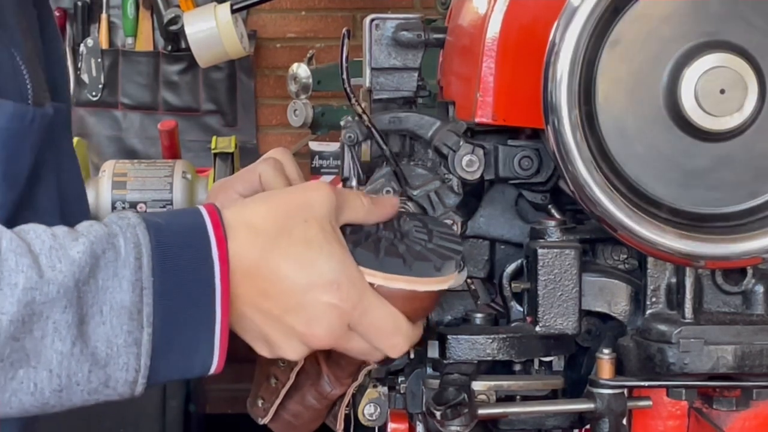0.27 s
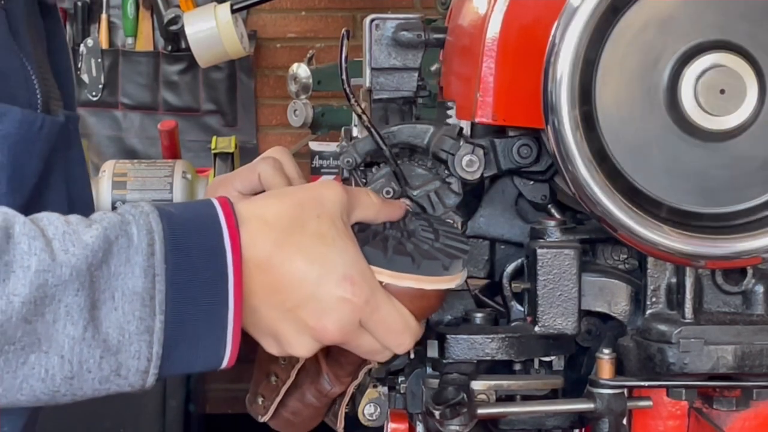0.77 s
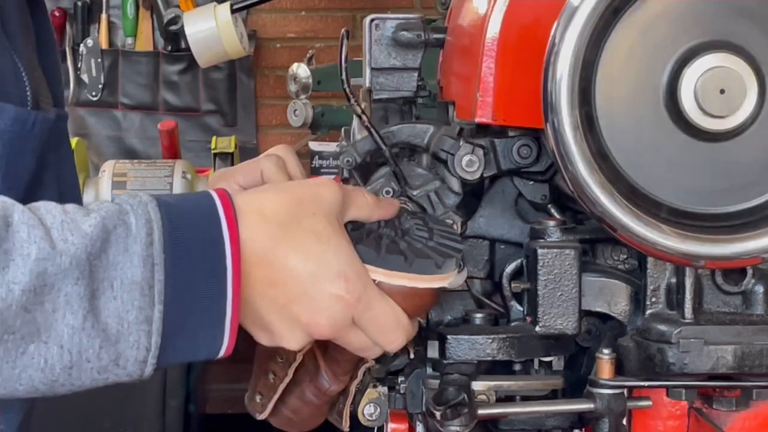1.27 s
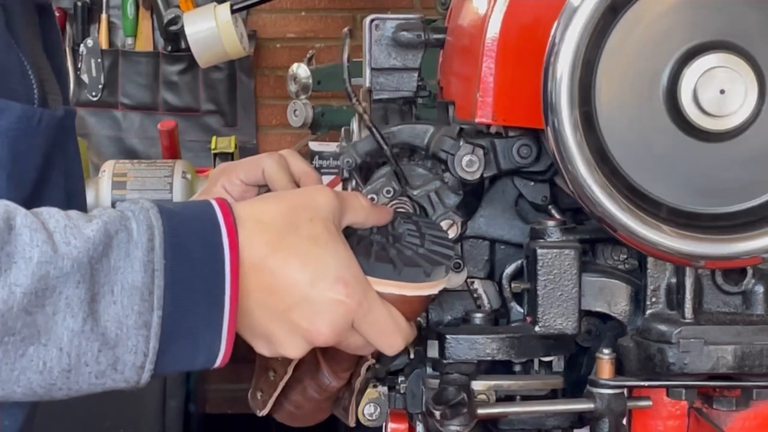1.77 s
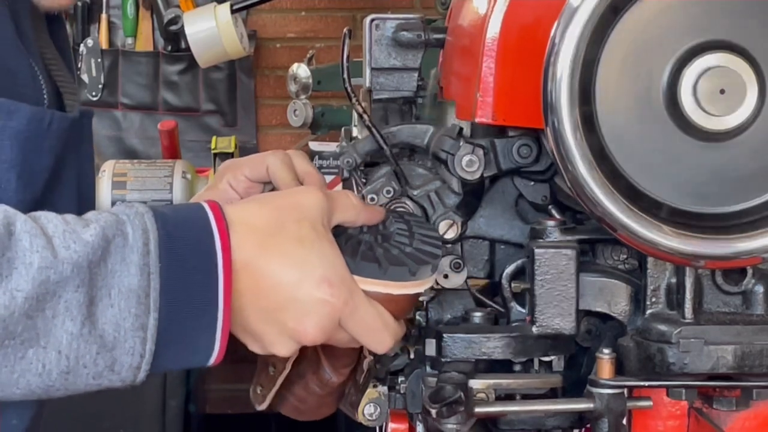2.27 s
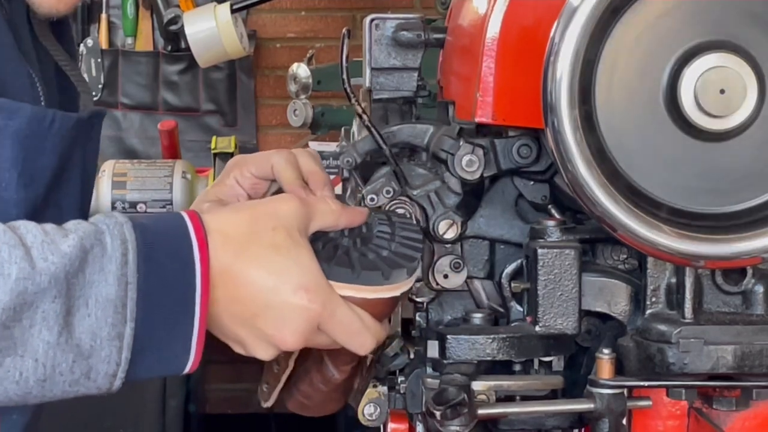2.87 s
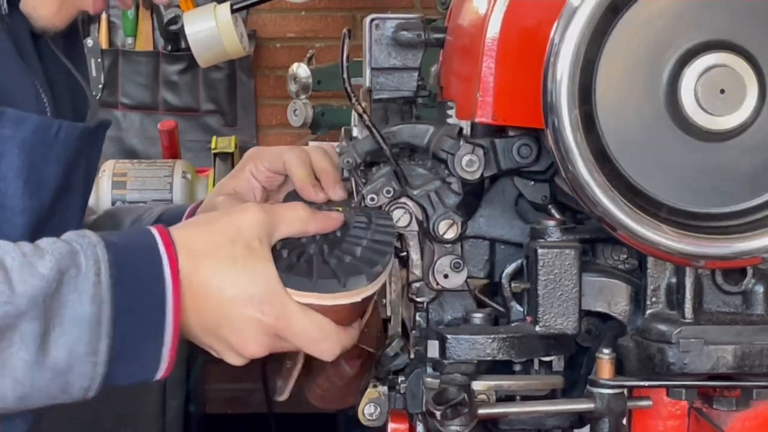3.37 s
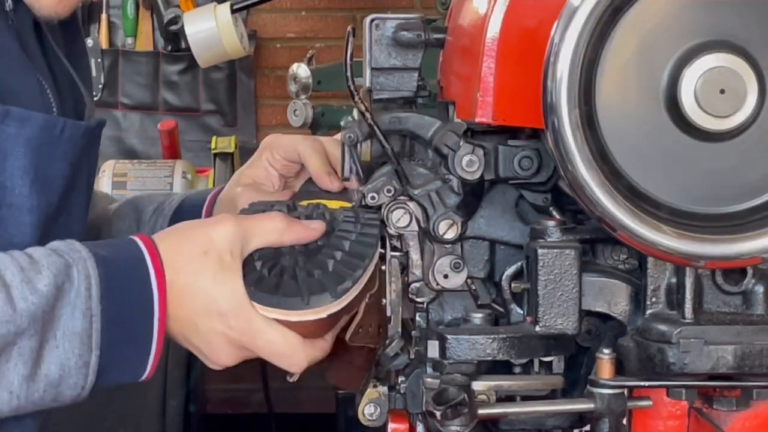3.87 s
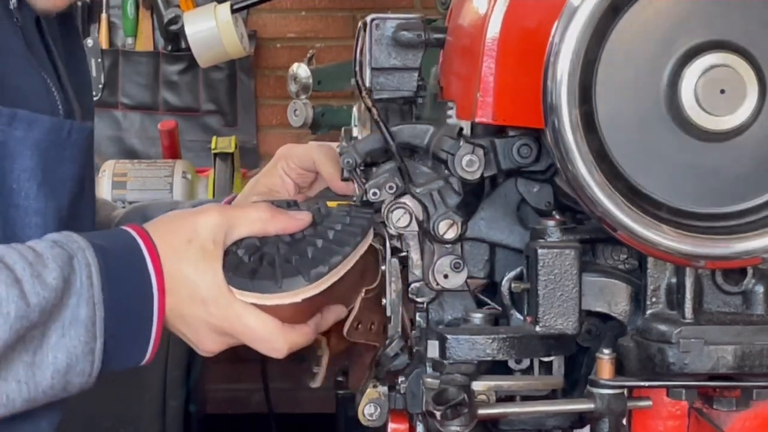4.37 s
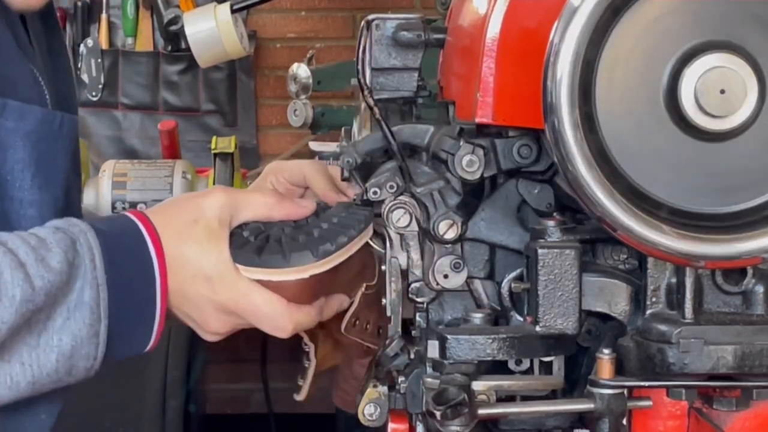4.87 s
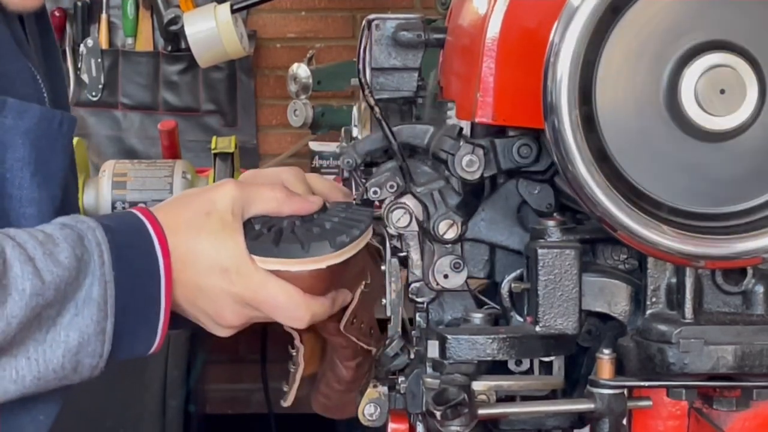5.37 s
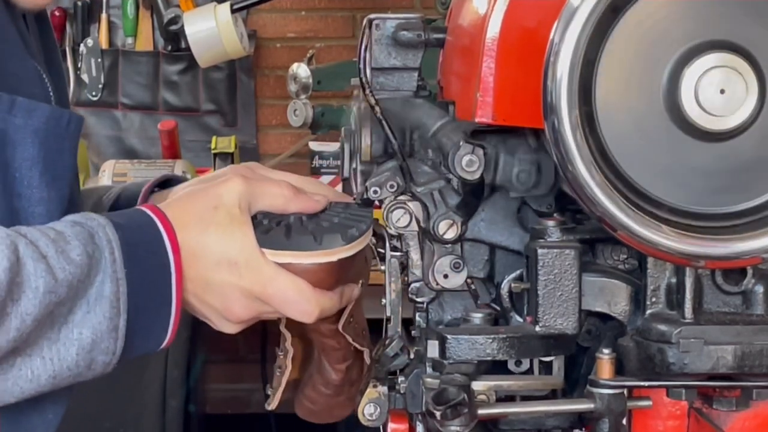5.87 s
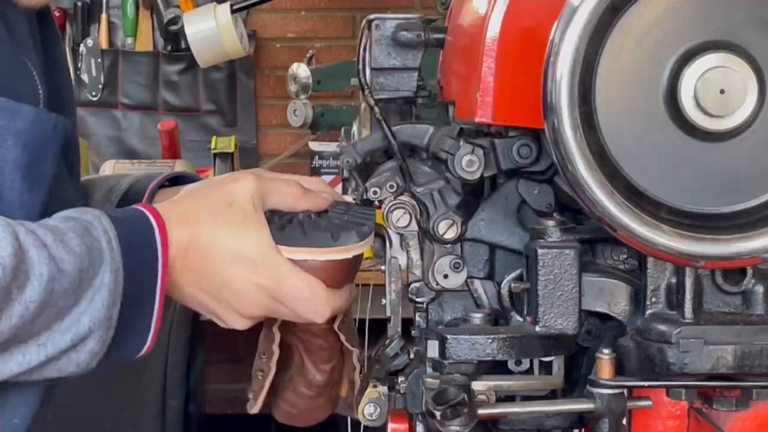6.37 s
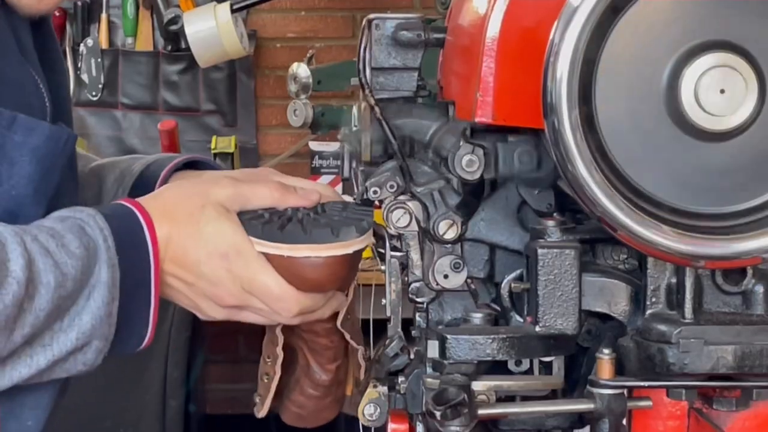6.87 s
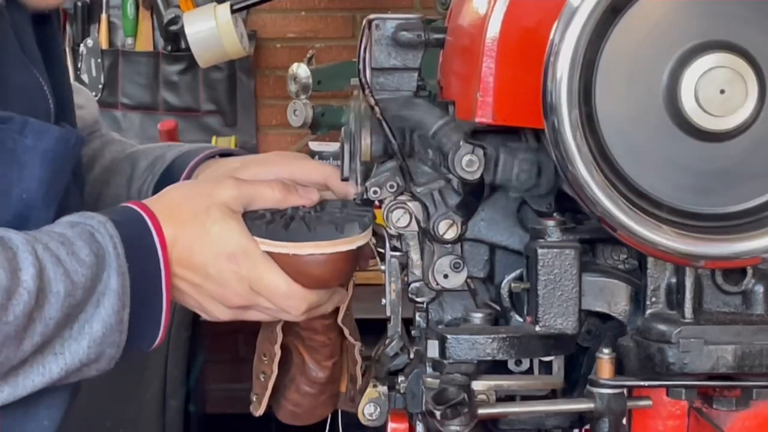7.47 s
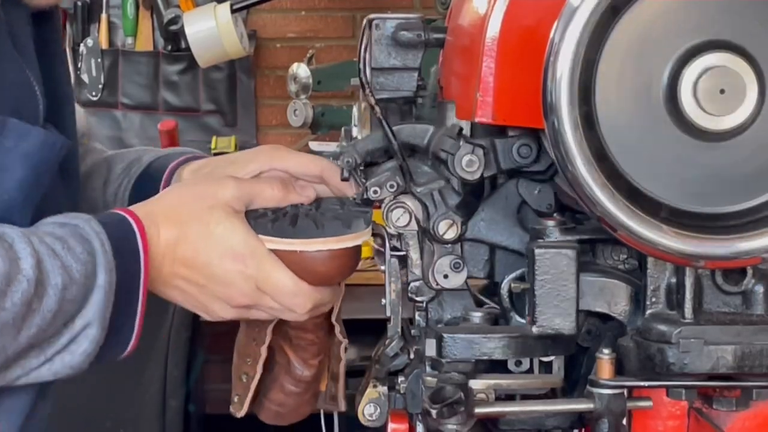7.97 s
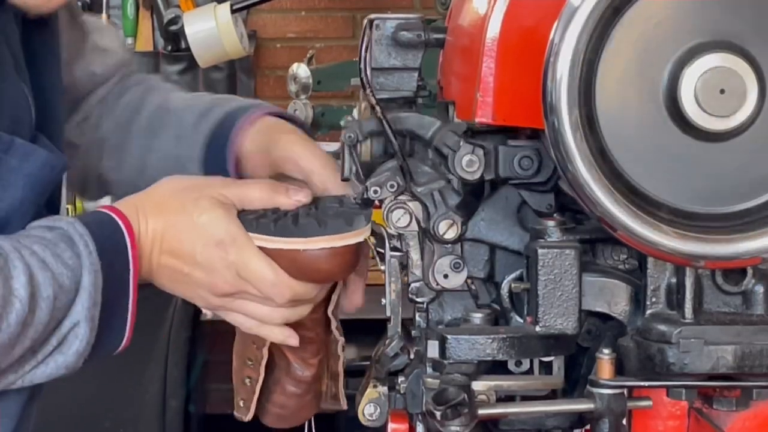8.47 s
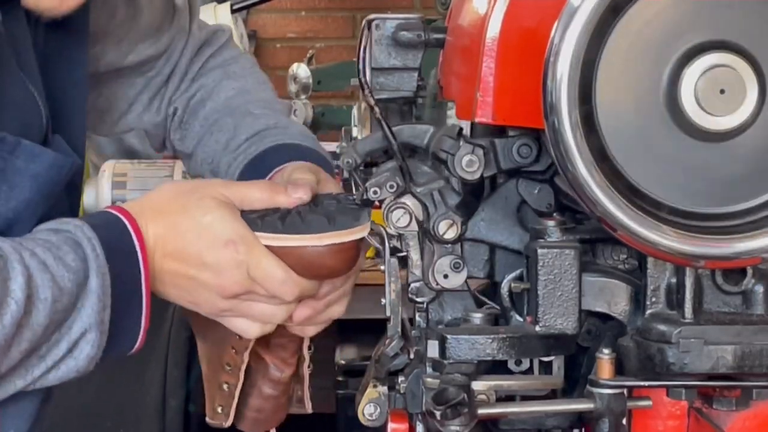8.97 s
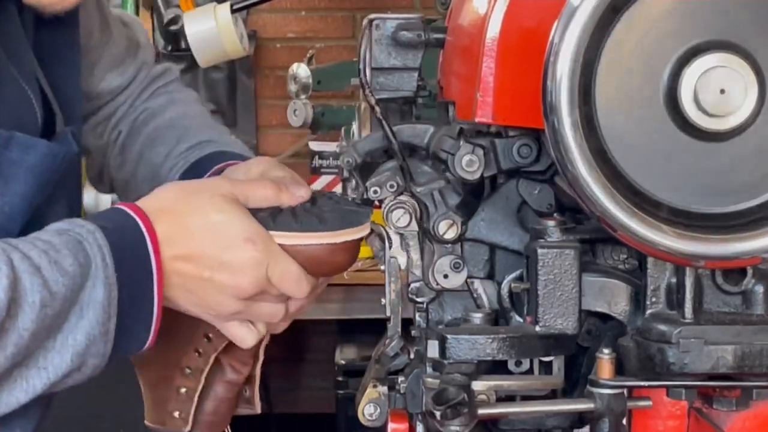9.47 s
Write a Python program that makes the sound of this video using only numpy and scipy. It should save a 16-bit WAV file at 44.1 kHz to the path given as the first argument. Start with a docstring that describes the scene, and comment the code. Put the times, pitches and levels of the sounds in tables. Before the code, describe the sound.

A cast-iron boot-stitching machine heard close up in a small workshop with short, dense echoes. From 0 to 0.9 s a low motor hum and soft belt rush idle beneath irregular, sharp lever knocks, clustered near 0.2, 0.35 and 0.9 s, with a brief low groan from the clutch. At about 0.95 s it grips, and the first, weaker stitch lands. From 1.2 s it pounds about four strokes a second, reaching five by 3 s as the hum sinks away. Each stroke is a bright steel punch, a locking clack some 40 ms later, rattling cams and links, short metallic rings, faint thread hiss, a droning drive and dull frame and bench thumps. An extra hard crack comes at 3.25 s. Around 5 to 5.9 s strokes soften and slow slightly, with a stray knock at 5.7 s. After 6 s they firm up, a faint gear whine joins, and the clatter continues unbroken to about 9.7 s.

```python
"""Boot-stitching machine in a small workshop

A cast-iron sole stitcher, heard close up, ticks over with a motor hum until a clutch bites.
It then makes about five stitches a second, and the hum sinks; in each turn the awl punches, cams and
levers clatter, the stitch is locked and the frame thumps. Random knocks and timed blows are played through
the ringing of the steel, frame and bench; sine waves make the hum, the drone and the clutch's groan."""
import sys
import numpy as np
from scipy import signal
from scipy.fft import rfft, irfft, next_fast_len
from scipy.io import wavfile
from scipy.ndimage import uniform_filter1d

SR = 44100
rng = np.random.default_rng(int(sys.argv[2]) if len(sys.argv) > 2 else 0)


def pcm_store(signal):
    """Save signal as 16-bit PCM."""
    levels = np.round(np.clip(np.atleast_2d(signal), -1, 1) * 32767)
    wavfile.write(sys.argv[1], SR, levels.astype(np.int16).T)


N = 429093

# one row a stitch, all levels relative: (time of awl's blow [s], force of stroke [dB], awl's blow [dB],
# time of locking blow [s], locking blow [dB], force of return [dB])
STITCHES = [(0.9585, -25.5, 6.5, 1.004, -5.5, -26.5), (1.1978, -18.5, 9.5, 1.245, 4.5, -26.5),
            (1.4388, -19.5, 8.5, 1.4752, 3.5, -26.0), (1.6765, -20.5, 8.0, 1.7278, 1.5, -27.0),
            (1.9115, -19.0, 8.5, 1.956, 3.0, -27.0), (2.1421, -20.5, 8.5, 2.1769, 0.5, -27.0),
            (2.3628, -20.5, 7.0, 2.4099, -2.5, -26.5), (2.5765, -20.0, 6.0, 2.6091, 3.0, -27.0),
            (2.7954, -21.5, 6.0, 2.8393, 2.5, -29.0), (3.0293, -22.0, 5.5, 3.0761, -1.0, -26.0),
            (3.2364, -19.5, 6.5, 3.2758, 3.0, -25.0), (3.4297, -19.0, 6.0, 3.4698, 1.0, -25.5),
            (3.6272, -20.5, 7.5, 3.6682, -1.5, -28.5), (3.8396, -21.5, 7.5, 3.8717, 3.0, -26.0),
            (4.0429, -19.5, 6.0, 4.0828, 4.0, -26.5), (4.2343, -20.0, 8.0, 4.2662, 2.5, -26.5),
            (4.4247, -22.0, 6.0, 4.4575, 0.5, -28.0), (4.6193, -21.5, 5.0, 4.6584, 2.5, -27.0),
            (4.812, -22.0, 4.0, 4.8456, 2.0, -28.5), (5.0247, -22.5, 0.0, 5.0529, -5.5, -29.0),
            (5.2122, -23.5, 3.0, 5.2547, -1.0, -30.5), (5.4254, -24.0, 5.5, 5.4638, -3.0, -31.5),
            (5.6523, -26.5, 4.0, 5.6934, 1.0, -31.0), (5.8898, -24.0, 5.0, 5.9261, 0.0, -29.0),
            (6.0984, -22.0, 3.5, 6.1327, 0.5, -28.0), (6.3015, -23.0, 5.0, 6.3456, 0.5, -30.0),
            (6.5135, -22.5, 5.5, 6.5532, 0.0, -27.0), (6.7229, -20.5, 3.5, 6.7631, -4.5, -27.5),
            (6.8989, -20.7, 6.5, 6.9306, 0.5, -26.5), (7.0898, -22.5, 6.0, 7.1229, 1.5, -28.0),
            (7.3022, -20.5, 5.5, 7.3406, -2.5, -27.0), (7.4809, -22.0, 5.0, 7.5136, 0.5, -27.0),
            (7.6753, -21.0, 6.5, 7.7074, -3.5, -27.0), (7.8649, -21.5, 6.0, 7.8966, -0.5, -27.0),
            (8.0552, -21.0, 3.5, 8.0893, 3.5, -27.5), (8.2507, -22.0, 5.0, 8.2811, 2.0, -27.5),
            (8.45, -22.0, 4.0, 8.4827, 0.5, -27.0), (8.6415, -21.5, 5.5, 8.6743, 0.0, -27.5),
            (8.8335, -21.0, 6.0, 8.8715, 0.0, -27.0), (9.0235, -22.0, 5.5, 9.0558, -0.5, -27.0),
            (9.2316, -22.0, 3.5, 9.2688, -5.0, -27.0), (9.4076, -21.5, 3.0, 9.4385, 3.0, -28.0),
            (9.6026, -22.5, 6.5, 9.634, -3.5, -27.5)]
# levers knocking as the machine goes into gear, and a few hard jolts later, all levels relative:
# (time [s], crack [dB], rattle of loose parts [dB], shaking of frame [dB])
KNOCKS = [(0.002, -31, -31, -27), (0.15, -10, -31.5, -32), (0.187, -9, -34, -25), (0.204, 2, -31.5, -29),
          (0.33, 1, -35, -47), (0.373, -6, -50, -44), (0.498, -6, -32, -48), (.558, -14, -42, -55),
          (.71, -11, -39, -55), (.868, -9, -46, -43), (0.892, -1, -23.5, -26), (0.906, 4, -24, -20),
          (1.0034, -8, -27, -18.5), (3.249, 6.5, -39, -15), (4.271, -2, -44, -42), (5.7005, 2, -33, -47)]


def amp(db):
    """Turns decibels into gain."""
    return 10 ** (np.asarray(db) / 20)


def evened(x):
    """Scales a sound to an rms of one."""
    return x / np.sqrt(np.mean(x ** 2) + 1e-20)


def wander(size):
    """Smooth random drift of unit rms: noise averaged twice over this many samples."""
    return evened(uniform_filter1d(uniform_filter1d(rng.standard_normal(N), size), size))


def add(mix, s, sound):
    """Mixes a sound in at time s."""
    part = mix[max(round(s * SR), 0):][:len(sound)]
    part += sound[:len(part)]


def above(x, hz, order=2):
    """Keeps what lies above a pitch (high-pass)."""
    return signal.sosfilt(signal.butter(order, min(hz, SR / 3), "high", fs=SR, output="sos"), x + 1e-18)


def read(points, hz):
    """Reads a curve on a log-frequency axis."""
    f, value = np.transpose(points)
    return np.interp(np.log(hz + 1), np.log(f + 1), value)


def causal(gain):
    """The prompt (minimum-phase) response with this gain round the whole frequency circle."""
    return np.fft.ifft(np.exp(np.conj(signal.hilbert(np.log(gain + 1e-6))))).real[:len(gain) // 2]


def colour(points, size=2048):
    """The response that has this spectrum."""
    return causal(amp(read(points, abs(np.fft.fftfreq(size, 1 / SR)))))


def modes(table, size=32768):
    """The response of a ringing body: its resonances add in power."""
    f = abs(np.fft.fftfreq(size, 1 / SR))
    power = sum((amp(db) / (1 + ((f - hz) / width) ** 2)) ** 2 for hz, width, db in table)
    return causal(np.sqrt(power))


def through(x, response):
    """Plays x through a response scaled to unit energy."""
    return signal.oaconvolve(x, response / np.linalg.norm(response))[:N]


def together(*levels_db):
    """Levels in dB added in power."""
    return 10 * np.log10(sum(amp(db) ** 2 for db in levels_db) + 1e-20)


def contacts(per_s, spread_db):
    """Many small impacts at random times, of uneven size and either sign, at unit rms."""
    when, force, side = rng.random((int(per_s * N / SR), 3)).T
    size = amp(spread_db * np.minimum(-np.log(1 - force), 4)) * np.sign(side - .5)
    return evened(np.bincount((when * N).astype(int), size, N))


def blows(times, db):
    """Single one-sample impulses at these times."""
    out = np.zeros(N)
    at = np.round(times * SR).astype(int)
    inside = (at >= 0) & (at < N)
    np.add.at(out, at[inside], amp(db)[inside])
    return out


def struck(times, db, crack_s, ring_s, count=7):
    """Steel on steel: a crack and a few short partials, which differ at every blow."""
    t = np.arange(SR // 40) / SR
    out = np.zeros(N)
    for s, gain in zip(times, amp(db)):
        crack = rng.choice([-1., 1.], len(t))
        partials_hz = 1200 * 9 ** rng.random(count)
        ring = np.sin(2 * np.pi * np.outer(partials_hz, t)).sum(0)
        blow = evened(crack * np.exp(-t / crack_s)) + amp(-6) * evened(ring * np.exp(-t / ring_s))
        add(out, s, gain * blow / np.linalg.norm(blow))
    return out


def ping(hz, decay_s):
    """One dying tone of a small lever."""
    t = np.arange(0, 2 * np.pi * decay_s, 1 / SR)
    return np.exp(-t / decay_s) * np.sin(2 * np.pi * hz * t)


def turn_starts():
    """The times of the awl's blows, with one more turn before and after."""
    awl = np.array(STITCHES)[:, 0]
    return np.r_[2 * awl[0] - awl[1], awl, 2 * awl[-1] - awl[-2]]


def turn_angle():
    """The share of a turn that has passed since the awl's last blow."""
    starts = turn_starts()
    return np.interp(np.arange(N) / SR, starts, np.arange(len(starts))) % 1


def stitch_force_db():
    """The force of the stroke, gliding from stitch to stitch."""
    return np.interp(np.arange(N) / SR, *np.transpose(STITCHES)[:2])


def engagement():
    """How far the clutch has taken hold, from almost nothing to one."""
    bite_s, rise_s = 0.794, 0.12
    return np.clip((np.arange(N) / SR - bite_s) / rise_s, 1e-6, 1)


def machine():
    """Blows and loose contacts excite the steel, the shafts, the cast frame and the bench."""
    clatter_db, hard_db, frame_db = load()
    ticks, knocks, thumps = cams(scatter_s=.0005, uneven_db=1.8)
    chatter = rattle(per_s=290, ring_s=.0025)
    hard = strikes() + amp(15) * ticks + amp(hard_db - 1) * chatter
    dull = contacts(per_s=4000, spread_db=2)
    steel = steel_contacts(hard, dull, clatter_db)
    links_db = (clatter_db + hard_db) / 2 - 5.5
    steel += clacks(links_db, per_s=110, decay_s=.004, low_hz=1100, high_hz=6500)
    steel += levers_ringing(scatter_s=.002, uneven_db=3, detune=.35) + thread()
    rings = shafts(hard, clatter_db)
    frame = cast_frame(knocks, frame_db)
    return steel + rings + frame + gear_whine(dull) + bench(thumps, frame_db)


def load():
    """Levels in dB of dull clatter, hard contacts and frame: idling, knocks, and one stroke in each turn."""
    # the levers rest for a moment before the foot grips: (share of a turn, level [dB])
    rest = [(.66, 0), (.76, -1.5), (.84, -2.5), (.88, 0)]
    t, angle = np.arange(N) / SR, turn_angle()
    # the stroke jumps in as the foot grips, swells up to the awl's blow, holds and dies away
    hold, fall, rise, grip = 0.054, 0.7, 0.15, 0.03  # shares of a turn
    after_awl = np.interp(angle, [hold, hold + fall], [1, 0])
    before_awl = np.interp(angle, [1 - rise, 1 - rise + grip, 1], [0, .36, .6])
    stroke = np.maximum(after_awl, before_awl)

    awl, _, _, _, _, return_db = np.transpose(STITCHES)
    engaged_db = 20 * np.log10(engagement())
    working_db = stitch_force_db() + engaged_db
    half_turn_s = np.diff(turn_starts())[1:] / 2
    returning_db = np.interp(t, awl + half_turn_s, return_db) + engaged_db
    returning_db += np.interp(angle, *np.transpose(rest))

    def blend(on_return_db, on_stroke_db):
        """Moves between the return's level and the stroke's."""
        return (1 - stroke) * (returning_db + on_return_db) + stroke * (working_db + on_stroke_db)

    at, _, rattle_db, shaking_db = np.transpose(KNOCKS)
    loose = settling(at, rattle_db, db_per_s=167)
    shaken = settling(at, shaking_db, db_per_s=120)
    clatter = together(blend(0.47, -0.5), loose, -44.5)  # the last level is the ticking over
    hard = together(blend(-13, -2), loose - 2.5)
    frame = together(blend(-0.5, -3.5), shaken, -35.5)  # and here too
    return clatter, hard, frame


def settling(times, db, db_per_s):
    """Level in dB of something that is shaken at these times and calms down."""
    power, fade = np.zeros(N), amp(-db_per_s * np.arange(SR) / SR) ** 2
    for s, gain in zip(times, amp(db)):
        add(power, s, gain ** 2 * fade)
    return 10 * np.log10(power + 1e-20)


def strikes():
    """Steel hits steel: the awl's punch, the locking blow, and the stray knocks of levers."""
    awl, _, awl_db, lock, lock_db, _ = np.transpose(STITCHES)
    punch = struck(awl, awl_db + .3, crack_s=.0019, ring_s=.004)
    locking = struck(lock, lock_db + .7, crack_s=.0013, ring_s=.005)
    levers = struck(*np.transpose(KNOCKS)[:2], crack_s=.0017, ring_s=.004)
    return punch + locking + uniform_filter1d(levers, size=2)  # softens the top of the lever knocks


def cams(scatter_s, uneven_db):
    """Each cam strikes near its own angle of every turn: ticks, frame knocks and bench thumps."""
    # parts that strike once a turn, levels relative to the stitch's force:
    # (share of a turn, tick [dB], lowest pitch of tick [Hz], frame knock [dB], bench thump [dB])
    cam_table = [(.072, 9, 2500, 17.5, -37), (.104, -0.5, 1500, 22, -26), (.14, -5, 1500, 16.5, -46),
                 (.205, 4.5, 1000, 18.5, -34), (.26, -1, 2000, 14, -45), (.315, 6, 5000, 14.5, -45),
                 (.4, -2, 1000, 16, -40), (.455, -5, 1500, 13.5, -36), (.505, -15, 1000, 17.5, -23.5),
                 (.547, -14, 2000, 13, -39), (.595, 0, 800, 14.5, -38), (.64, -4, 800, 12, -17),
                 (.69, -6, 1500, 12, -20), (.725, -17, 1500, 15.5, -19), (.876, -3, 1000, 11, -20),
                 (.925, 1, 1500, 18, -31), (.96, 6.5, 1990, 12, -33), (.978, 0, 1000, 18, -31)]
    awl, force_db = np.transpose(STITCHES)[:2]
    turn_s = np.diff(turn_starts())[1:]
    ticks, knocks, thumps = np.zeros((3, N))
    for share, tick_db, lowest_hz, knock_db, thump_db in cam_table:
        late, force, weight = rng.standard_normal((len(awl), 3)).T
        at = awl + share * turn_s + scatter_s * late
        tick = struck(at, tick_db + force_db + uneven_db * force, crack_s=.002, ring_s=.006)
        ticks += above(tick, lowest_hz)
        knocks += blows(at, knock_db + force_db + uneven_db * weight)
        thumps += blows(at, thump_db + force_db + .5 * uneven_db * weight)
    return ticks, knocks, thumps


def rattle(per_s, ring_s):
    """Loose steel parts chatter: each contact is a short fading burst of noise of its own."""
    t = np.arange(SR // 70) / SR
    fade = np.exp(-t / ring_s) + np.exp(-10 * t / ring_s)
    out = np.zeros(N)
    for when, force in rng.random((int(per_s * N / SR), 2)):
        add(out, when * N / SR, amp(10 * force ** 2) * fade * rng.standard_normal(len(t)))
    return evened(out)


def steel_contacts(hard, dull, clatter_db):
    """Hard steel contacts sound bright; dull oiled ones follow the level of the clatter."""
    # spectrum of hard steel contacts: (frequency [Hz], relative level [dB])
    hard_colour = [(100, -55.5), (400, 6.5), (900, -1), (1500, -1), (1800, -10), (2800, 1), (4200, 2.8),
                   (6000, -3), (8000, -1.5), (10000, -3), (13000, -6), (16000, -16.5)]
    # spectrum of dull oiled contacts: (frequency [Hz], relative level [dB])
    dull_colour = [(60, -53), (200, -0.5), (500, -2), (900, 3.5), (1400, -2.5), (1800, 1.5), (2300, 2),
                   (2800, -1.5), (4200, 0.5), (6000, -4.5), (9000, -11), (16000, -36)]
    return through(hard, colour(hard_colour)) + through(amp(clatter_db - 4) * dull, colour(dull_colour))


def clacks(level_db, per_s, decay_s, low_hz, high_hz, count=3):
    """Loose links of many sizes knock at random, each with partials of its own."""
    out = np.zeros(N)
    for when, force, *links in rng.random((int(per_s * N / SR), 2 + count)):
        ring = sum(ping(low_hz * (high_hz / low_hz) ** link, decay_s) for link in links)
        add(out, when * N / SR, amp(9 * force) * ring)
    return amp(level_db) * evened(out)


def clink(hz, decay_s, count=3):
    """A small lever is hit: its main tone, and a few weaker partials that die at once."""
    out = ping(hz, decay_s)
    for partial_hz in rng.uniform(1800, 6500, count):
        add(out, 0, amp(-11) * ping(partial_hz, .002))
    return out


def levers_ringing(scatter_s, uneven_db, detune):
    """Shafts and levers ring near their own angles of each turn, unevenly; some clink out loudly."""
    # rings in every turn, relative to the stitch's force:
    # (share of a turn, middle frequency [Hz], decay [s], relative level [dB])
    turn_rings = [(.075, 3400, .007, -4), (.095, 2380, .014, -10), (.165, 3450, .005, -4),
                  (.19, 2380, .012, -9), (.195, 1450, .004, -5), (.385, 2380, .018, -11),
                  (.46, 2370, .01, -13), (.64, 2350, .012, -13), (.87, 2385, .022, -9),
                  (.925, 2385, .018, -9)]
    # levers that clink out above the clatter: (time [s], relative level [dB], frequency [Hz], decay [s])
    loud_clinks = [(.204, -19, 2750, .005), (.205, -21, 4500, .005), (.329, -16, 3340, .003),
                   (.608, -31, 4400, .02), (.866, -26, 2330, .02), (.905, -20, 4480, .005),
                   (.958, -16, 3400, .004), (.959, -19, 4740, .005), (.962, -21, 2335, .018),
                   (1.198, -18, 3450, .003), (1.264, -19, 1290, .007), (1.44, -16, 3450, .003),
                   (1.476, -17, 4130, .003), (1.483, -18, 3445, .007), (1.929, -17, 3360, .008),
                   (2.142, -16, 4650, .005), (4.018, -24, 2390, .025), (4.058, -18, 3360, .007),
                   (4.082, -15, 1380, .005), (4.218, -22, 2385, .025), (4.234, -15, 1465, .005),
                   (4.248, -17, 3360, .007), (4.437, -18, 3880, .007), (4.658, -17, 1500, .005),
                   (5.011, -22, 4480, .003), (5.044, -20, 3100, .003), (5.409, -28, 2380, .025),
                   (6.28, -25, 2370, .03), (6.303, -18, 1465, .005), (6.526, -17, 3445, .008),
                   (6.694, -24, 2390, .025), (6.727, -24, 2380, .025), (7.265, -23, 2375, .03),
                   (7.286, -22, 4600, .005), (7.298, -19, 3190, .007), (7.46, -24, 2390, .025),
                   (7.498, -20, 2070, .007), (7.513, -21, 3360, .007), (7.881, -25, 2370, .025),
                   (8.089, -17, 4080, .005), (8.264, -21, 3420, .008), (8.28, -19, 3420, .006),
                   (9.439, -18, 3790, .003), (9.441, -20, 2400, .015), (9.603, -20, 5000, .005)]
    awl, force_db = np.transpose(STITCHES)[:2]
    turn_s = np.diff(turn_starts())[1:]
    out = np.zeros(N)
    for share, hz, decay_s, db in turn_rings:
        late, force, pitch = rng.standard_normal((len(awl), 3)).T
        times = awl + share * turn_s + scatter_s * late
        gains = amp(db - 1.5 + force_db + uneven_db * force)
        for s, gain, shift in zip(times, gains, pitch):
            add(out, s, gain * clink(hz + detune * shift / decay_s, decay_s))
    for s, db, hz, decay_s in loud_clinks:
        add(out, s, amp(db - 2.5) * clink(hz, decay_s))
    return out


def thread():
    """The waxed thread hisses as it is drawn tight after the awl's blow."""
    # when the hiss starts, is full, eases and ends: one column (share of a turn)
    hiss_shares = [.13, .2, .33, .42]
    drawn = np.interp(turn_angle(), hiss_shares, [0, 1, 1, 0])
    hiss = above(contacts(per_s=3000, spread_db=3), 6500)
    return engagement() * drawn * amp(stitch_force_db() - 15.5) * hiss


def shafts(hard, clatter_db):
    """The gears whirr on between strokes and, with the hard contacts, keep the steel shafts ringing."""
    # steel shafts and levers that ring on: (frequency [Hz], width [Hz], relative level [dB])
    shaft_modes = [(1330, 40, -12), (1520, 142, -7), (2122, 160, -3), (2383, 88, -5), (3363, 40, -5.5),
                   (5250, 60, -5)]
    flare_db = 0.5 * wander(size=1500)  # the ringing comes and goes
    gears = amp(0.74 * clatter_db - 11 + flare_db) * contacts(per_s=300, spread_db=3.5)
    return amp(-7) * through(gears + 0.36 * hard, modes(shaft_modes))


def cast_frame(knocks, frame_db):
    """Jolts and cam knocks ring the cast frame and its covers."""
    # cast frame and covers: (frequency [Hz], width [Hz], relative level [dB])
    frame_modes = [(178, 24.6, -6.5), (223, 18.4, -2.5), (268, 20, 0.5), (294, 18.7, 4.5), (321.4, 14, 1.5),
                   (338, 12.2, 3), (398, 14.3, 0), (428, 17.2, 2.5), (543, 30, -1), (572, 22, -8),
                   (639, 26, -7.5), (693, 14.6, -4), (848, 34, -8.5)]
    jolts = contacts(per_s=300, spread_db=1.8)
    return flexed(through(amp(frame_db - 5) * jolts + knocks, modes(frame_modes)))


def flexed(x, drift_s=.0002):
    """The swinging arms detune the frame a little: its ringing drifts ahead and behind in time."""
    t = np.arange(N) / SR
    return np.interp(t + drift_s * wander(size=1500), t, x)


def gear_whine(dull):
    """The gears sing, louder in the later stitches, as dull contacts set off two resonances."""
    # pitches of the gears: (frequency [Hz], width [Hz], relative level [dB])
    whine_modes = [(425, 10.7, -3), (693, 8.7, -0.5)]
    # how hard they are driven: (time [s], level [dB])
    whine_level = [(1, -50), (5.8, -47), (6.3, -39), (9.7, -38.5)]
    level_db = np.interp(np.arange(N) / SR, *np.transpose(whine_level))
    return through(amp(level_db) * dull, modes(whine_modes))


def bench(thumps, frame_db):
    """The bench under the machine booms with the cams' thumps and rumbles with the frame."""
    # low resonances of the bench: (frequency [Hz], width [Hz], relative level [dB])
    bench_modes = [(47, 12, -38), (76.4, 29, -1), (94.5, 15, -1), (111, 26, 3.5)]
    rumble = amp(frame_db - 21.5) * rng.standard_normal(N)
    return through(amp(31) * thumps + rumble, modes(bench_modes))


def drive(uneven_db=0.0, waver_hz=2):
    """The drone of the loaded drive sags through every turn and picks up again before the awl."""
    # drone over one turn: (share of a turn, middle frequency [Hz], level over the stitch's force [dB])
    drone = [(0, 124, -18.5), (.25, 118, -18), (.5, 107, -19), (.7, 93, -16.5), (.85, 108, -27)]
    angle, (share, hz, db) = turn_angle(), np.transpose(drone)
    pitch = np.interp(angle, share, hz, period=1) + waver_hz * wander(size=3000)
    drone_db = np.interp(angle, share, db, period=1) + uneven_db * wander(size=3000)
    level = amp(stitch_force_db() + drone_db)
    return engagement() * level * np.sqrt(2) * np.sin(2 * np.pi * np.cumsum(pitch) / SR)


def clutch(waver_hz=5, shudder_db=3):
    """The clutch plate drags and sets the frame groaning: each groan swells, sinks and lets go."""
    # groans: (start [s], length [s], level before it sinks and shudders [dB])
    groans = [(.19, .14, -27.5), (.9, .08, -21), (1.0, .35, -31)]
    level = np.zeros(N)
    for start, length, db in groans:
        t = np.arange(0, length, 1 / SR)
        ramps = np.minimum(np.minimum(t, length - t) / .015, 1)  # 15 ms in and out
        add(level, start, ramps * amp(db - 8 * t / length))
    turns = np.cumsum(328 + waver_hz * wander(size=600)) / SR  # groans around 328 Hz
    return np.sqrt(2) * np.sin(2 * np.pi * turns) * level * amp(shudder_db * wander(size=500))


def motor(waver_hz=2.7):
    """The motor: a rush of small contacts from the belt, and a sine hum that wavers a little."""
    # spectrum of motor and belt: (frequency [Hz], relative level [dB])
    belt_colour = [(15, -77), (25, -37), (84, -18), (99, -3.5), (119, 5), (136, -5), (148, -31.5),
                   (173, -4.5), (198, -31), (340, -9.5), (782, -25.5), (1100, -16), (1450, -18.5),
                   (1800, -20.5), (2350, -20), (3000, -29.5), (4260, -31), (8130, -39), (15500, -42)]
    # motor hum: (time [s], level [dB])
    hum_level = [(0, -34), (.4, -47.5), (.75, -34.5), (1, -34), (2.3, -36.5), (2.8, -52), (9.7, -51)]
    pitch = 120.3 + waver_hz * wander(size=4000)
    hum = np.sqrt(2) * np.sin(2 * np.pi * np.cumsum(pitch) / SR)
    belt = amp(-36) * through(contacts(per_s=2500, spread_db=-1), colour(belt_colour))
    return belt, amp(np.interp(np.arange(N) / SR, *np.transpose(hum_level))) * hum


def workshop(x, bass_t60, treble_t60, count=3):
    """The noise comes now from one part of the machine, now from another, each with its own echoes."""
    shares = np.array([wander(size=400) for _ in range(count)]) ** 2
    shares /= np.linalg.norm(shares, axis=0)
    return sum(through(x * share, echoes(bass_t60, treble_t60)) for share in shares)


def echoes(bass_t60, treble_t60):
    """Sparse echoes of a crowded little room; each t60 is the time [s] to die away by 60 dB."""
    count = SR // 2
    taps = rng.choice([-1., 1.], count)
    taps *= rng.random(count) < 2500 / SR  # about 2500 echoes a second
    taps *= np.arange(count) > .003 * SR  # none in the first 3 ms
    hz, t, z = signal.stft(taps, SR, nperseg=256)
    t60 = read([(300, bass_t60), (10000, treble_t60)], hz)[:, None]
    return above(signal.istft(z * amp(-60 * t / t60), SR, nperseg=256)[1], 110)


def stereo_image(front, diffuse):
    """Stereo image: wide below 2 kHz, centred to 6 kHz, then left phase lags right increasingly."""
    # phase of left behind right: (frequency [Hz], phase [radians])
    phase_lag = [(0, 0), (6150, 0), (6400, .7), (7400, 1.8), (8250, np.pi), (9700, 4.6), (11600, 2 * np.pi),
                 (13300, 7.8), (14800, 3 * np.pi), (16000, 10.2)]
    # how much diffuse sound goes to the sides: (frequency [Hz], level [dB])
    width = [(60, -17), (150, -17), (350, -15), (650, -13.5), (1850, -10), (2150, -41), (8000, -107)]
    # balance: (frequency [Hz], left over right [dB])
    balance = [(60, -1.4), (300, -1.6), (600, -.4), (1500, 0)]
    likeness = .72  # how alike the phase-shifted side sound stays to the front sound
    size = next_fast_len(N)
    hz = np.fft.rfftfreq(size, 1 / SR)
    a, b = rfft(front, size), rfft(diffuse, size)
    half_phase = np.interp(hz, *np.transpose(phase_lag)) / 2
    mid = np.cos(half_phase) * a
    shifted = likeness * a + np.sqrt(1 - likeness ** 2) * b
    side = -1j * np.sin(half_phase) * shifted + amp(read(width, hz)) * b
    lean = amp(read(balance, hz) / 2)
    return irfft(np.array([(mid + side) * lean, (mid - side) / lean]), size)[:, :N]


def scene():
    """Machine, drive, clutch and motor in the workshop."""
    belt, hum = motor()
    direct = machine() + belt
    front = direct + hum + drive() + clutch()
    front += amp(-5.5) * workshop(direct, bass_t60=0.22, treble_t60=0.32)
    diffuse = amp(2.5) * workshop(direct, bass_t60=0.31, treble_t60=0.16)
    return stereo_image(front, diffuse)


def record(dry):
    """Cuts the deepest bass, clips the peaks and removes the highest treble."""
    held = np.clip(above(dry, 36, order=6), -.9, .9)
    low_pass = signal.firwin(511, 15900, window=("kaiser", 9), fs=SR)
    return signal.oaconvolve(held, low_pass[None], "same")


dry = scene()
out = record(dry)
pcm_store(out)
```